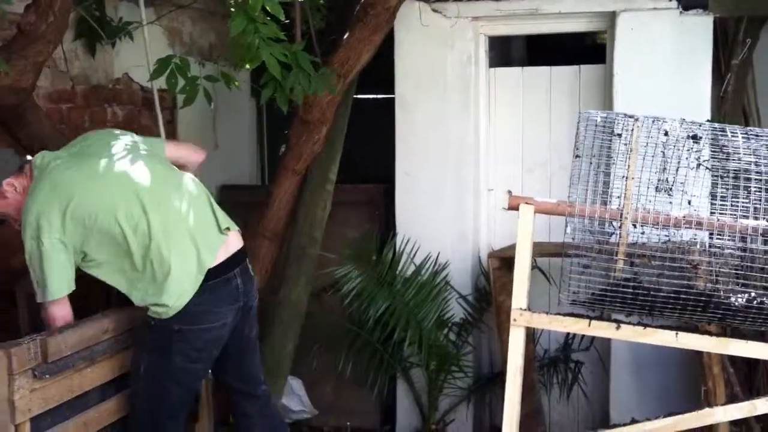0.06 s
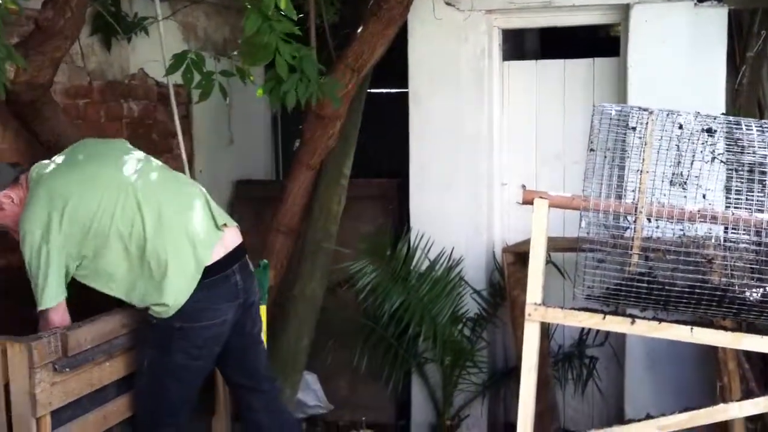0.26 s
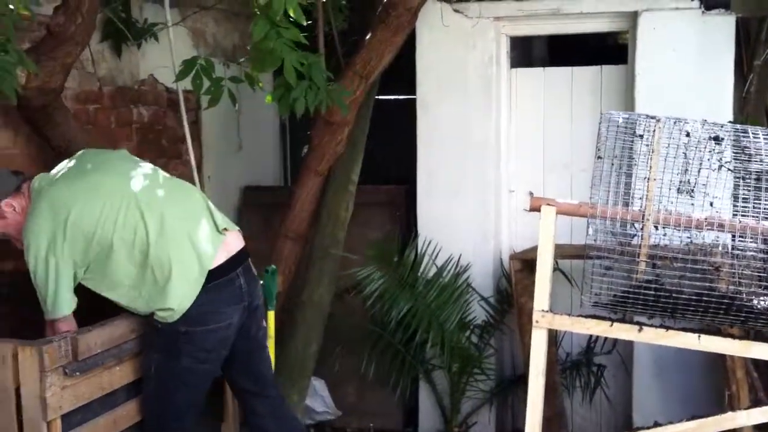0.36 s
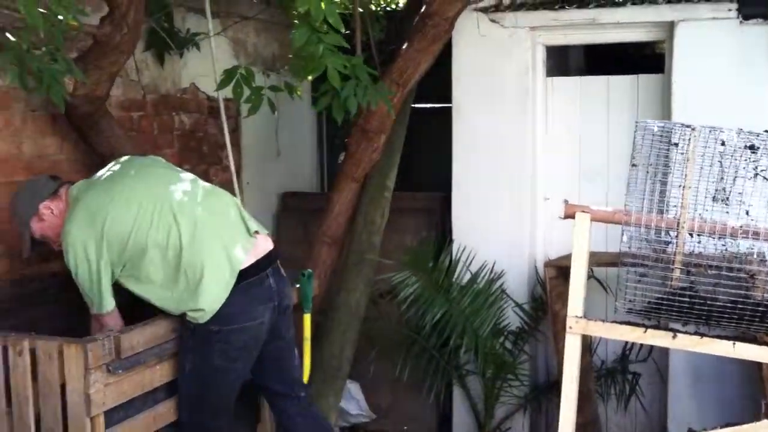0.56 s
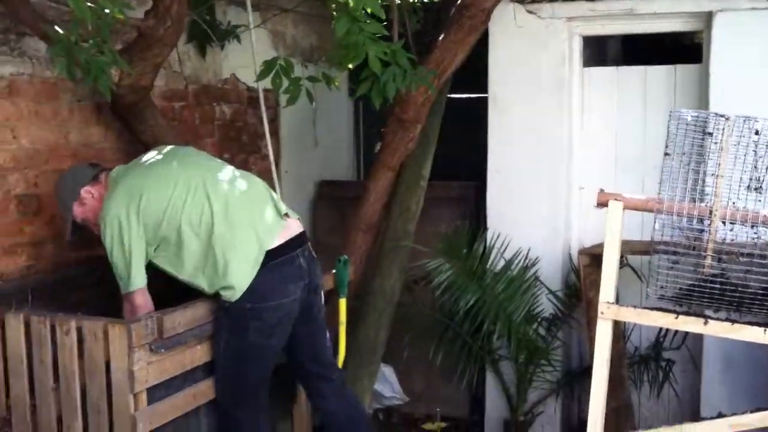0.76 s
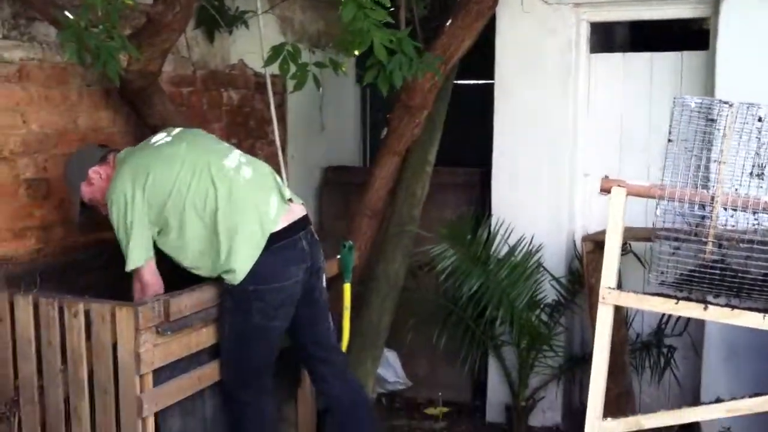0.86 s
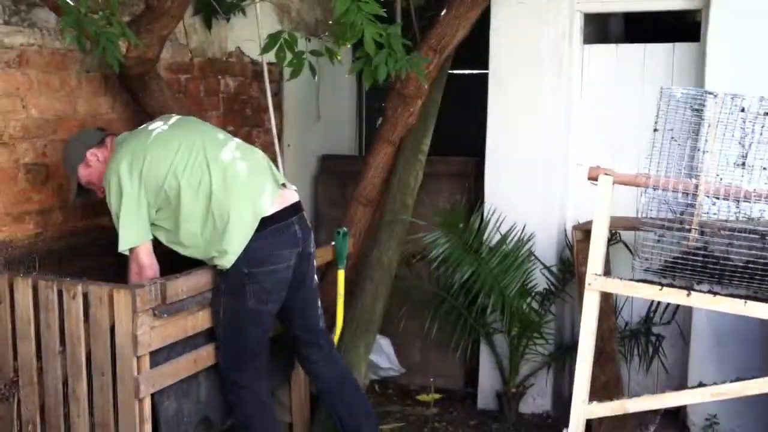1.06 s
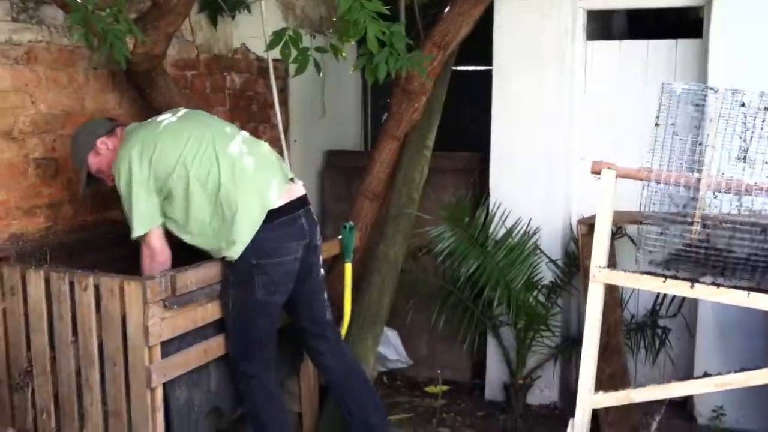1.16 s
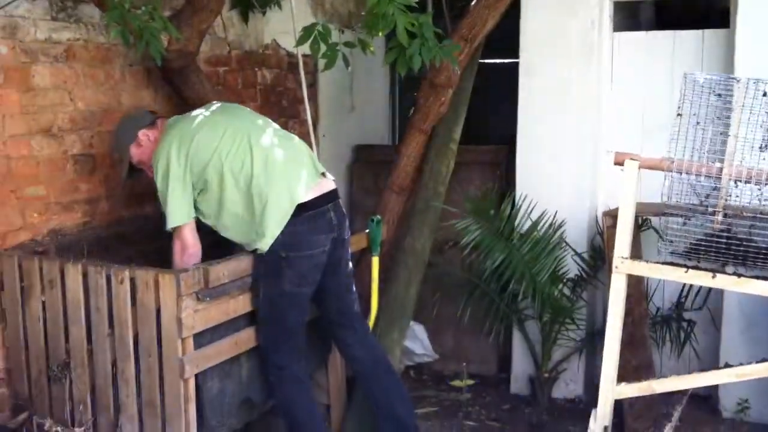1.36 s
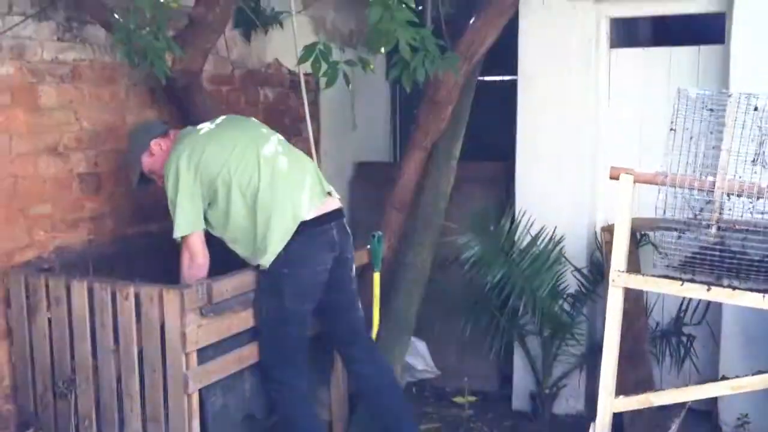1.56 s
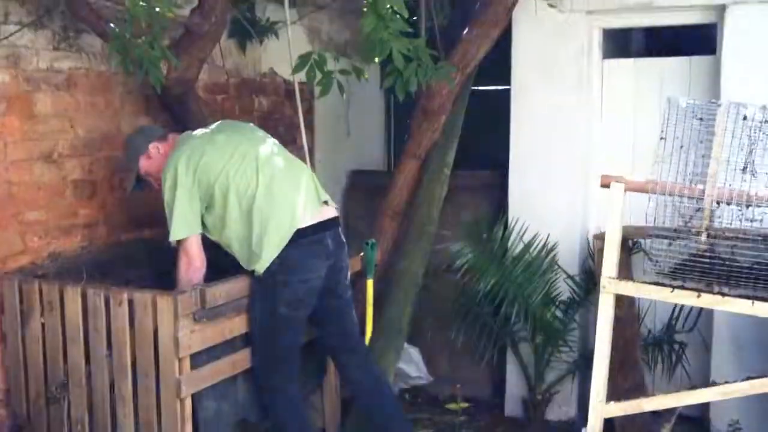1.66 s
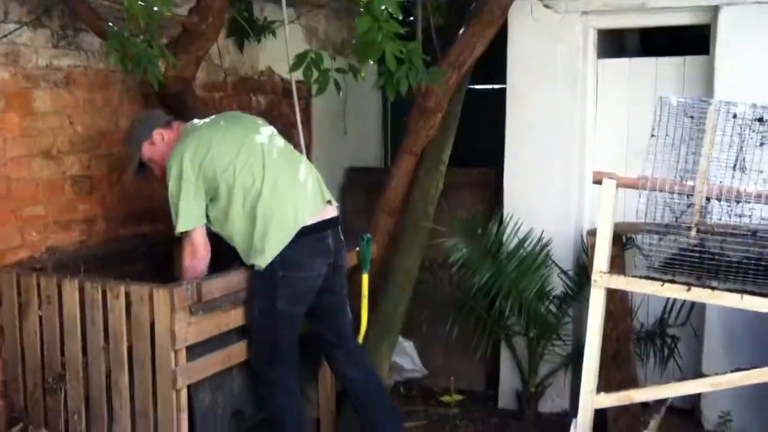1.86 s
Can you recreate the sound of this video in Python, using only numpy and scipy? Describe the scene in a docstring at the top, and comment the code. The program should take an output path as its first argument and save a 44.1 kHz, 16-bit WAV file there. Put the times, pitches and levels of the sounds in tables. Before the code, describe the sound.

A hand tool knocks on a wooden compost bin, then scoops through dry, rustling matter.

```python
"""A wooden compost bin in a small walled yard, one microphone close by, someone digging with a hand tool.
Stalks rustle; at 0.23 s the tool thuds on the slats and crunches, ringing, into the dry heap.
Scooping strokes and light knocks follow, the strongest stroke at 0.9 s with a squeak of the blade.
Near 1.5 s the blade squeaks twice more and dry stems crackle; a last scoop comes at 1.85 s.
Short reflections from the walls and quiet outdoor air lie under it all."""
import sys
import numpy as np
from scipy import signal
from scipy.fft import rfft, irfft
from scipy.io import wavfile
from scipy.ndimage import uniform_filter1d

SR = 44100
rng = np.random.default_rng(int(sys.argv[2]) if len(sys.argv) > 2 else 0)


def put_to_file(sound):
    """Save the sound as 16-bit audio at rate SR, in the file named by the first command-line argument."""
    columns = np.atleast_2d(sound).T  # one column per channel
    safe = np.clip(columns, -1, 1)
    whole_steps = np.round(safe * 32767)
    wavfile.write(sys.argv[1], SR, whole_steps.astype(np.int16))


N = 83790
TIME = np.arange(N) / SR

# jolts of the tool into the heap: peak t/s, rise/s, fall/s, crunch level/dB, ring level/dB
TOOL_JOLTS = [(0.248, 0.0046, .010, -30, -32.5), (0.257, 0.0054, 0.0098, -31, -33),
              (.271, 0.0033, .010, -30.5, -49), (0.296, 0.0052, 0.027, -35.5, -54)]
# modes of the tool: f/Hz, relative level/dB, t60/s
TOOL_MODES = [(1102, -6.5, 0.25), (1360, -8.5, 0.1), (1592, -1, 0.16), (1688, -1.5, 0.15),
              (2058, 0.5, 0.13), (2137, -3.5, 0.14), (2633, -2, 0.2), (2752, -7, 0.074), (2940, 2, 0.08),
              (3040, -2.5, 0.069), (3330, -6, 0.13), (3680, -17, 0.14), (3984, -7, 0.28),
              (5870, -6.5, 0.18)]
# spectrum of dry matter giving way: f/Hz, relative level/dB
CRUNCH_SPECTRUM = [(60, -24), (200, -13.5), (400, -3.5), (750, -1), (1500, 2), (2800, -2), (4200, -1),
                   (7000, -4), (10000, -7), (13000, -2), (16000, -5)]
def tool_stab():
    """Close to the microphone, the tool crunches into the heap in quick jolts that set it ringing."""
    envelope = sum(amp(db) * swell(peak, rise, fall) for peak, rise, fall, db, _ in TOOL_JOLTS)
    crunch = envelope * rustle(CRUNCH_SPECTRUM)
    drive = sum(amp(db) ** 2 * swell(peak, rise, rise / 2) / (rise * SR)
                for peak, rise, _, _, db in TOOL_JOLTS)
    mode_norm = np.linalg.norm(amp([db for _, db, _ in TOOL_MODES]))
    ring = 0
    for hz, db, t60 in TOOL_MODES:
        retained = np.exp(-2 * np.log(1000) / (t60 * SR))  # share of energy left after one sample
        energy = signal.lfilter([1], [1, -retained], drive)
        ring += amp(db) / mode_norm * np.sqrt(energy) * friction_tone(hz, width_hz=22.6)
    return crunch + ring


# blows on the slats: t/s, level/dB, most excited f/Hz, spread/octaves
SLAT_BLOWS = [(.234, -37, 430, 0.44), (0.2333, -36.5, 1600, 0.74), (.239, -36.5, 1150, 0.7),
              (.254, -39.5, 386, 0.45), (.265, -41.5, 1200, 0.8), (.292, -44, 750, 1.0),
              (.294, -49.5, 190, 0.58), (0.4365, -51, 1100, 1.1), (0.548, -53, 900, 1.6),
              (.806, -55, 270, 0.67), (.841, -52, 2500, 1), (1.002, -50, 470, 0.61),
              (1.026, -41.5, 1410, 1), (1.172, -49, 1850, 0.33), (1.301, -50, 700, 0.48),
              (1.393, -56, 1600, 0.61), (1.512, -52.5, 900, 1.2)]
# modes of the wooden bin: f/Hz, relative level/dB, t60/s
BIN_MODES = [(185, -13, 0.105), (302, -7, 0.063), (370, 0.5, 0.064), (428.3, -0.5, 0.087), (574, -6, 0.018),
             (790, 2.5, 0.032), (1106, 1.5, 0.024), (1373, 5.5, 0.028), (1597, 5.5, 0.024),
             (1875, -3, 0.021), (2320, 0, 0.022), (3340, -21, 0.016), (4630, -14, .02), (6360, -19, .015)]
def bin_knocks(contact_s=0.0011, scatter_turns=0.38, shove_at_s=0.235, shove_s=0.0057, shove_db=-47.5):
    """Each blow rings the bin's modes; the first heavy thud also shoves the whole box."""
    hz, mode_db, t60 = np.transpose(BIN_MODES)[:, :, None]
    knocks = np.zeros(N)
    for start, db, centre_hz, octaves in SLAT_BLOWS:
        t = np.maximum(TIME - start, 0)[:round((start + .3) * SR)]
        weight = amp(mode_db + bell_db(hz, centre_hz, octaves))
        weight /= np.linalg.norm(weight)
        turns = hz * t + scatter_turns * rng.random(hz.shape)
        modes = weight * np.exp(-np.log(1000) * t / t60) * np.sin(2 * np.pi * turns)
        attack = 1 - np.exp(-t / contact_s)
        knocks[:len(t)] += 2 * amp(db) * modes.sum(0) * attack
    half_cycles = np.maximum(TIME - shove_at_s, 0) / shove_s
    shove = amp(shove_db) * np.sin(np.pi * half_cycles) * np.exp(-half_cycles)
    return knocks + shove


# strokes in the bin: peak t/s, rise/s, fall/s, soil level/dB, stalk level/dB, leaf level/dB
SCOOP_STROKES = [(0.013, 0.03, 0.055, -92, -58, -79), (0.054, 0.014, 0.021, -70.5, -56.5, -79),
                 (0.541, 0.023, 0.026, -59.5, -54.5, -58), (0.584, 0.027, 0.041, -63, -63.5, -58.5),
                 (.872, 0.027, 0.036, -59, -54, -56.5), (.895, 0.015, 0.01, -53, -45, -47),
                 (0.905, 0.0046, 0.014, -52.5, -48, -41), (0.937, 0.009, 0.02, -57.5, -53.5, -48),
                 (0.98, 0.0048, 0.009, -60, -51.5, -51), (1.07, 0.029, 0.047, -67, -59, -68),
                 (1.165, 0.013, 0.026, -74, -57.5, -64), (1.225, 0.022, 0.026, -68.5, -58.5, -59),
                 (1.32, 0.013, 0.051, -62, -59, -61.5), (1.438, 0.011, 0.011, -62, -54, -54),
                 (1.452, 0.0086, 0.024, -58, -51.5, -49), (1.464, 0.0076, 0.019, -55.5, -49, -51.5),
                 (1.605, 0.022, 0.024, -86, -60.5, -63), (1.844, 0.019, 0.068, -63, -59, -55),
                 (1.888, 0.017, 0.044, -60.5, -65, -69)]
# the heap stirring under the hands: t/s, stalk level/dB, leaf level/dB
HEAP_STIR = [(0, -74, -68), (.2, -72, -71), (.4, -62.5, -74), (.48, -66.5, -66), (.63, -72.5, -63),
             (.7, -68.5, -66), (.76, -66.5, -65), (.83, -64.5, -63), (1.0, -65, -63.5), (1.12, -63, -66.5),
             (1.28, -68, -61.5), (1.37, -64.5, -60), (1.41, -65.5, -67), (1.56, -65, -62.5),
             (1.7, -72.5, -71.5), (1.8, -67, -64), (1.9, -61, -59.5)]
# spectra of dull soil, stalks and crisp dry leaves: f/Hz, relative level/dB
SOIL_SPECTRUM = [(40, -29), (100, -18.5), (180, -1.5), (380, -0.5), (600, -5), (1200, -40), (4000, -56)]
STALK_SPECTRUM = [(150, -41), (500, -13), (900, 1.5), (1400, 3.5), (2000, -0.5), (2900, -1.5), (4500, -12),
                  (8000, -31.5), (16000, -40)]
LEAF_SPECTRUM = [(400, -24), (1800, 5), (3200, -1), (6500, 0), (9500, -1.5), (13000, 2), (16000, -5.5)]
def scooping():
    """Strokes move soil, stalks and dry leaves; between them the heap keeps stirring."""
    soil_power, stalk_power, leaf_power = sum((amp(levels)[:, None] * swell(peak, rise, fall)) ** 2
                                              for peak, rise, fall, *levels in SCOOP_STROKES)
    times, stalk_db, leaf_db = np.transpose(HEAP_STIR)
    stalk_power += amp(np.interp(TIME, times, stalk_db)) ** 2
    leaf_power += amp(np.interp(TIME, times, leaf_db)) ** 2
    soil = np.sqrt(soil_power) * rustle(SOIL_SPECTRUM)
    stalks = np.sqrt(stalk_power) * rustle(STALK_SPECTRUM)
    leaves = np.sqrt(leaf_power) * rustle(LEAF_SPECTRUM)
    return soil + stalks + leaves


# stems breaking: peak t/s, rise/s, fall/s, level/dB, centre f/Hz, spread/octaves
STEM_SNAPS = [(0.2414, .0008, 0.0059, -42, 4170, 0.22), (0.251, 0.00092, 0.0061, -39, 4000, 0.23),
              (.26, 0.002, 0.01, -30.5, 2880, 0.21), (.318, .0008, .004, -44, 4000, 0.77),
              (.333, .001, .004, -44, 2500, 0.8), (.4374, 0.00036, 0.0014, -49.5, 2480, 0.77),
              (.865, .001, 0.0044, -48, 3000, 0.45), (1.026, 0.00076, 0.0082, -55, 2700, .3),
              (1.068, .001, .004, -58.5, 3200, 0.53), (1.1742, 0.001, .0025, -51.5, 3540, 0.59),
              (1.213, .001, .004, -59, 3400, 0.41), (1.316, 0.0022, .005, -54, 3000, 0.35),
              (1.352, 0.0017, 0.018, -50.5, 13200, 0.19), (1.514, 0.0023, 0.016, -43.5, 5000, 1.5),
              (1.528, 0.0027, 0.023, -46, 5500, 1.3)]
def snapping_stems():
    """Dry stems snap and shed grit, from single sharp ticks to short bursts of crackle."""
    snaps = np.zeros(N)
    for peak, rise, fall, db, centre_hz, octaves in STEM_SNAPS:
        crackle = colour(fractures(), lambda hz: bell_db(hz, centre_hz, octaves))
        snaps += amp(db) * swell(peak, rise, fall) * crackle
    return snaps


# scrapes of the blade: peak t/s, rise/s, fall/s, level/dB, f/Hz
BLADE_SCRAPES = [(.897, 0.008, 0.014, -51, 6700), (1.463, 0.01, 0.016, -48, 1057),
                 (1.535, .01, 0.018, -54.5, 4580)]
def blade_squeaks():
    """Friction on the scraping blade gives brief, rough squeaks."""
    return sum(amp(db) * swell(peak, rise, fall) * friction_tone(hz, width_hz=55)
               for peak, rise, fall, db, hz in BLADE_SCRAPES)


# reverberation of the yard: f/Hz, t60/s
YARD_DECAY = [(150, 0.37), (500, 0.4), (1500, 0.28), (4000, 0.23), (9000, 0.3), (15000, 0.15)]
def yard_reflections(direct, echoes_per_s=4000, build_up_s=0.0076):
    """The near walls scatter the sound back to the microphone; the treble dies faster."""
    length = SR // 2
    echoes = rng.standard_normal(length) * (rng.random(length) < echoes_per_s / SR)
    hz, t, bands = signal.stft(echoes, SR, nperseg=256)
    decay = np.exp(-np.log(1000) * t / at_hz(YARD_DECAY, hz)[:, None])
    tail = signal.istft(bands * decay, SR)[1]
    tail *= np.minimum(np.arange(len(tail)) / SR / build_up_s, 1) ** 2
    return signal.fftconvolve(direct, tail / np.linalg.norm(tail))[:N]


# spectrum of the outdoor background: f/Hz, relative level/dB
AIR_SPECTRUM = [(20, -12), (55, -22), (100, -8.5), (180, 2), (300, 2), (600, -5.5), (1300, -8.5),
                (3000, -15.5), (7000, -18), (13000, -18), (16000, -10)]
def outdoor_air(level_db=-61):
    """A steady, low hush all around the microphone."""
    return amp(level_db) * colour(rng.standard_normal(N), lambda hz: at_hz(AIR_SPECTRUM, hz))


def fractures(per_s=7000, spread_db=3, hiss_share=0.43):
    """Countless tiny fractures of uneven size over a fine hiss."""
    size = amp(spread_db * np.minimum(rng.exponential(1, N), 5))
    clicks = size * rng.choice([-1, 1], N) * (rng.random(N) < per_s / SR)
    return np.sqrt(1 - hiss_share) * unit_rms(clicks) + np.sqrt(hiss_share) * rng.standard_normal(N)


def rustle(spectrum):
    """Steady crackle of one material."""
    return colour(fractures(), lambda hz: at_hz(spectrum, hz))


def friction_tone(hz, width_hz):
    """A resonance whose phase is jostled by friction, at rms 1."""
    drift = np.cumsum(rng.standard_normal(N)) * np.sqrt(2 * np.pi * width_hz / SR)
    return np.sqrt(2) * np.sin(2 * np.pi * hz * TIME + uniform_filter1d(drift, size=90))


def swell(peak, rise, fall):
    """Rounded rise to a peak, then exponential release."""
    t = TIME - peak
    return np.exp(-(np.minimum(t, 0) / rise) ** 2 - np.maximum(t, 0) / fall)


def colour(x, db_of):
    """Gives a steady signal a spectrum, at rms 1."""
    gain = amp(db_of(np.fft.rfftfreq(N, 1 / SR)))
    return unit_rms(irfft(rfft(x) * gain, N))


def bell_db(hz, centre_hz, octaves):
    """A broad hump around a frequency."""
    return -20 * np.log10(1 + (np.log2((hz + 1) / centre_hz) / octaves) ** 2 / 2)


def at_hz(table, hz):
    """Reads a table on a log-frequency axis."""
    f, value = np.transpose(table)
    return np.interp(np.log(hz + 1), np.log(f + 1), value)


def amp(db):
    """Decibels to gain."""
    return 10 ** (np.asarray(db) / 20)


def unit_rms(x):
    """Scales to rms 1."""
    return x / np.sqrt(np.mean(x ** 2) + 1e-20)


def scene(reflections_db=-11.5):
    """At the microphone, in mono: the digging up close, the walls behind it, then the open air."""
    digging = bin_knocks() + tool_stab() + scooping() + snapping_stems() + blade_squeaks()
    return (digging + amp(reflections_db) * yard_reflections(digging) + outdoor_air())[None]


def record(dry, cutoff_hz=15780):
    """The recorder's band limit cuts the highest treble."""
    lowpass = signal.firwin(1023, cutoff_hz, window=("kaiser", 9), fs=SR)
    return signal.oaconvolve(dry, lowpass[None], "same")


dry = scene()
out = record(dry)
put_to_file(out)
```